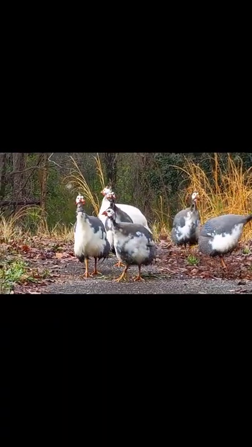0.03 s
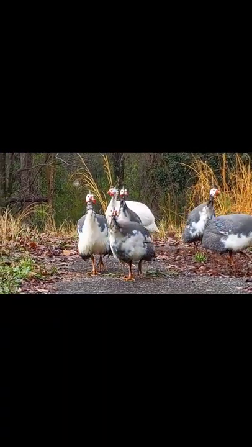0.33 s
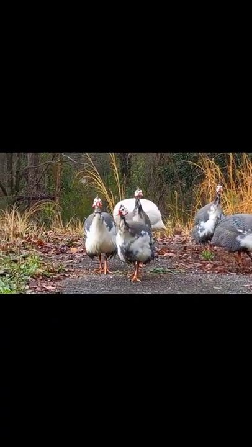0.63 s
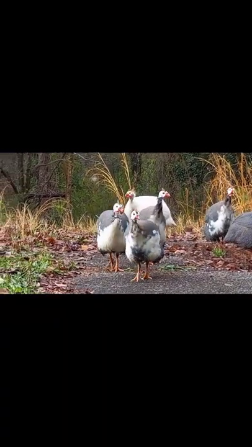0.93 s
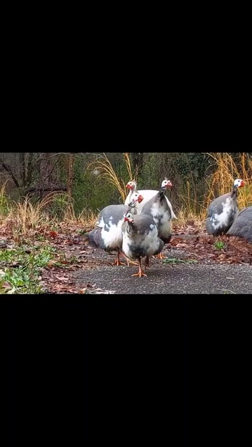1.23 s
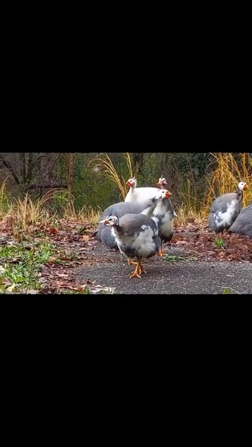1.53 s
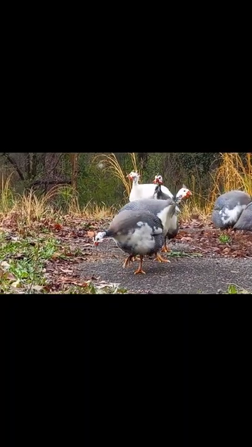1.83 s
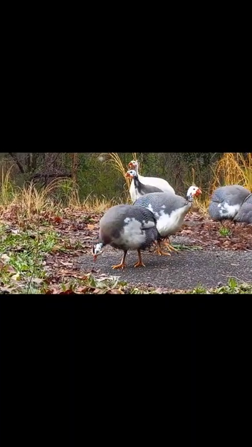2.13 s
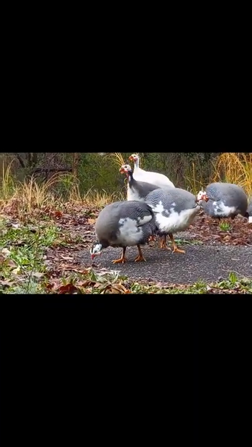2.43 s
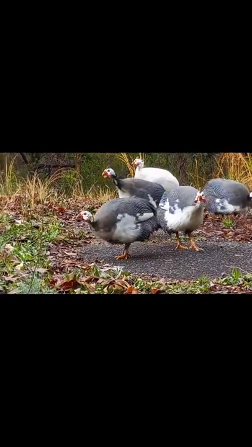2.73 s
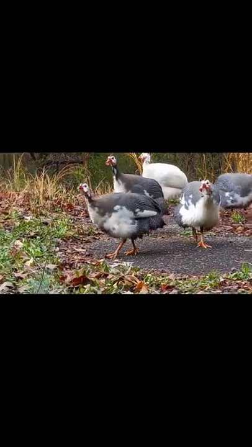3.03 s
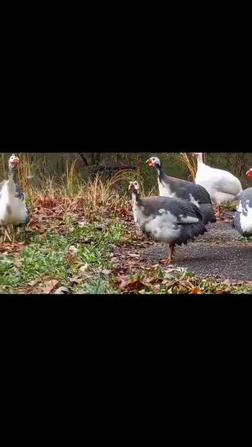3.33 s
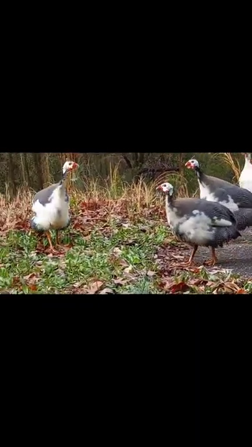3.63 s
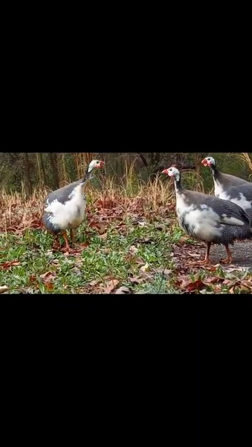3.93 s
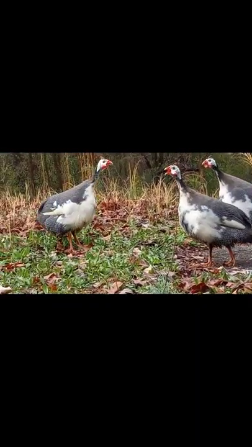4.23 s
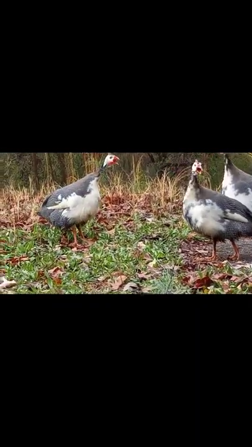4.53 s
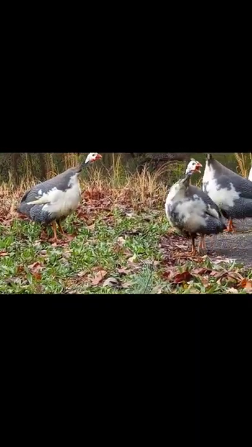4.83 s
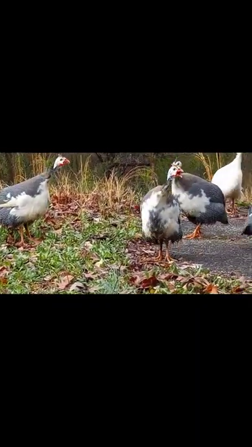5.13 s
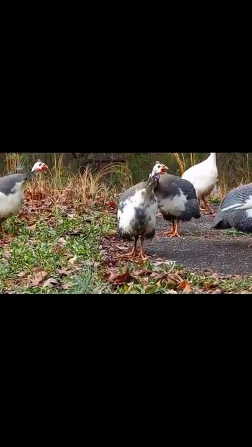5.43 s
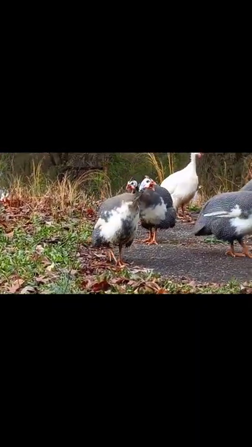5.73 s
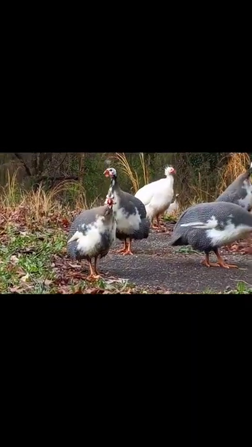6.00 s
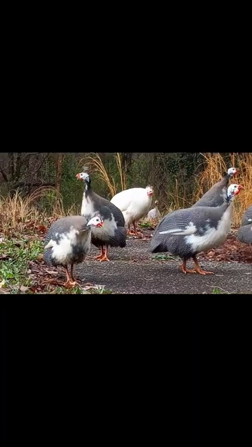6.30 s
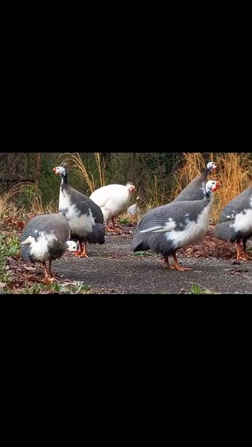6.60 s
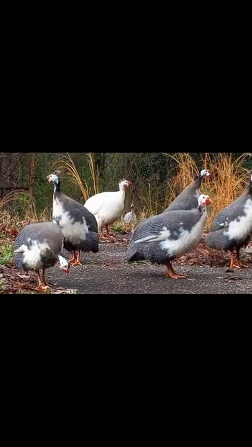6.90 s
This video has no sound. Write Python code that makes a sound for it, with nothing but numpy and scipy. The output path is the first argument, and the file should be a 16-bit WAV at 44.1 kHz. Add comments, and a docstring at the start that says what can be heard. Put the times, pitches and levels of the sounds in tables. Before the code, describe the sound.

A flock of guinea fowl calls a few steps from the microphone at the edge of a wood. Harsh, buzzing rasps come in bursts, often opening with a squeak and breaking into a shrill rattle. Midway the birds drop to soft clucks and peeps as the stereo image shifts. Then a louder, denser run of rasps and rattles follows, easing into short calls. A faint low rumble lies underneath.

```python
"""Guinea fowl scolding at a wood's edge

A flock on a path, a few steps from a stereo microphone that swings round midway. Snapping membranes
and puffs of air make each call a rasping buzz; it often opens with a squeak and, with the beak wide,
breaks into a shrill, fluttering rattle. In the pauses the birds peep and cluck. Ground and brush
scatter the calls; far behind lie two faint cries and a low outdoor rumble."""
import sys
import numpy as np
from scipy import signal
from scipy.fft import rfft, irfft
from scipy.io import wavfile
from scipy.ndimage import uniform_filter1d

SR = 44100
rng = np.random.default_rng(int(sys.argv[2]) if len(sys.argv) > 2 else 0)


def wav_record(signal):
    """Record a signal, one row per channel, as 16-bit PCM in the file named by sys.argv[1]."""
    frames = np.transpose(np.atleast_2d(signal))
    bounded = np.clip(frames, -1, 1)
    # unit amplitude maps onto the largest positive 16-bit level
    quanta = np.round(bounded * 32767).astype(np.int16)
    wavfile.write(sys.argv[1], SR, quanta)


N = 311346

# The flock, close by; all levels are relative. Drawn-out rasps, one table each: t/s, level/dB, pitch/Hz
LONG_RASPS = [
    [(.803, -27.5, 385.5), (.9, -28, 390.2), (.97, -27, 363.4), (1.04, -28.5, 353), (1.068, -38, 319)],
    [(1.292, -23.5, 378.5), (1.38, -28, 367.3), (1.51, -26, 386.6), (1.608, -27.5, 369.3),
     (1.642, -39.5, 313.6)],
    [(2.138, -27.5, 364), (2.26, -29.5, 352.4), (2.37, -25, 403.6), (2.48, -28, 367.5), (2.585, -25, 388.2),
     (2.67, -28.5, 361), (2.762, -29, 352), (2.79, -39, 327.5)],
    [(4.492, -29, 367.3), (4.56, -26.5, 350.5), (4.66, -26, 362.9), (4.82, -29, 381), (4.94, -28.5, 366),
     (5.03, -27.5, 385.2), (5.17, -31, 345)],
    [(5.49, -31.5, 352.6), (5.61, -28.5, 371.4), (5.8, -29.5, 374.3), (5.89, -28, 393.8),
     (6.07, -27.5, 378.9), (6.21, -28, 366), (6.25, -40.5, 340.5)],
]
# short rasps: start/s, length/s, level/dB, pitch/Hz
SHORT_RASPS = [(0.0, 0.049, -28.5, 368.3), (0.189, 0.13, -28.5, 382.8), (0.489, 0.17, -28, 379.2),
               (1.226, 0.048, -39.5, 349), (2.84, 0.071, -26, 379.5), (4.287, 0.092, -27, 352.4),
               (5.171, 0.14, -32.5, 365.2), (5.3, 0.053, -26.5, 379), (5.422, .075, -28, 377.3),
               (6.405, 0.16, -30.5, 367.2), (6.648, 0.16, -31, 379), (6.867, .14, -35.5, 363.5),
               (7.045, 0.032, -28.5, 371)]
# shrill rattles: start/s, loudest beat/s, end/s, level/dB, beak resonance/Hz, beat rate/Hz, depth/0-1
RATTLES = [(0.0, -0.014, .045, -15.5, 3550, 78, 0), (0.231, .289, .308, -19.5, 4140, 55, 0.16),
           (0.524, 0.577, .668, -19, 3410, 51, 0.26), (1.034, 1.081, 1.11, -24.5, 3770, 51, 0.4),
           (1.226, 1.25, 1.264, -20.5, 3750, 23, 0.11), (1.315, 1.337, 1.375, -27, 4130, 69, 0.22),
           (2.772, 2.784, 2.8, -28.5, 3400, 51, 0.01), (2.814, 2.829, 2.843, -36, 3450, 62, 0.2),
           (2.851, 2.889, 2.908, -26.5, 4300, 24, 0.13), (3.944, 3.971, 3.998, -24, 4160, 107, 0.23),
           (4.291, 4.323, 4.37, -16.5, 3920, 58, 0.2), (4.5, 4.531, 4.597, -21, 3850, 55, 0.25),
           (4.606, 4.643, 4.74, -16.5, 4120, 52, 0.34), (4.74, 4.848, 4.94, -20, 4100, 48.6, 0.46),
           (4.937, 4.966, 5.15, -21.5, 3896, 47.9, 0.32), (5.172, 5.21, 5.27, -19, 3820, 50, 0.27),
           (5.302, 5.333, 5.35, -17.5, 4040, 44, 0.22), (5.428, 5.461, 5.485, -16.5, 3940, 49, 0.25),
           (5.596, 5.623, 5.72, -15.5, 4210, 49, 0.17), (5.742, 5.796, 5.85, -22, 3700, 45, 0.18),
           (5.853, 5.888, 6.06, -16.5, 4370, 57, 0.02), (6.042, 6.095, 6.17, -21, 4050, 100, 0.06),
           (6.176, 6.217, 6.245, -21.5, 3876, 47, 0), (6.314, 6.352, 6.358, -25.5, 3650, 90, 0),
           (6.434, 6.479, 6.55, -22.5, 4110, 92, .12), (6.621, 6.663, 6.77, -24, 4540, 71, 0.03),
           (6.875, 6.944, 7.0, -25, 3840, 59, 0.23)]
# peeps and opening squeaks: start/s, length/s, start pitch/Hz, end pitch/Hz, level/dB, overtones/dB
PEEPS = [(0.185, 0.022, 1575, 1650, -36, -4), (0.483, 0.025, 1503, 1610, -39, -2),
         (0.797, 0.017, 1373, 1430, -51, 13), (1.028, 0.073, 963, 1007, -49.5, 6),
         (1.216, 0.028, 1318, 1460, -51, 17), (1.284, 0.019, 1493, 1660, -34, -9),
         (1.756, 0.018, 1408, 1492, -53, 13.5), (1.848, 0.045, 1504, 1450, -53, 1.5),
         (1.981, 0.023, 1440, 1530, -51.5, 11.5), (2.011, .012, 1810, 1430, -48.5, 12),
         (2.1, 0.049, 1496, 1413, -53, 9), (2.129, 0.024, 1474, 1615, -44, 10),
         (2.371, 0.017, 1637, 1350, -42, 13), (2.584, 0.01, 1570, 1380, -42.5, 18.5),
         (2.765, 0.029, 1720, 1350, -39.5, 4), (2.803, 0.045, 953, 845, -49, 11),
         (2.81, 0.041, 1904, 1640, -49.5, 22), (2.996, 0.051, 1810, 1455, -55, 19),
         (3.279, 0.075, 1048, 940, -57, 9.5), (3.382, 0.017, 1380, 1250, -52, 10),
         (3.588, 0.039, 1590, 1630, -43, -13), (4.118, 0.034, 1676, 1590, -41, -3),
         (4.279, 0.028, 1558, 1450, -33, 4.5), (4.482, 0.038, 1425, 1510, -36.5, 10),
         (5.181, 0.016, 1576, 1614, -28.5, -7), (5.382, 0.053, 961, 898, -53.5, 20),
         (5.598, 0.019, 1680, 1690, -29, -16), (6.231, 0.039, 950, 886, -53.5, 15),
         (6.306, 0.026, 1515, 1644, -48, 20.5), (6.399, 0.025, 1380, 1460, -46, 8.5),
         (6.605, 0.031, 1335, 1436, -52.5, 18), (6.809, 0.022, 1570, 1380, -43.5, 11),
         (7.044, 0.021, 1500, 1624, -40.5, 2)]
# soft hoarse clucks: start/s, length/s, level/dB
CLUCKS = [(1.757, 0.047, -42), (1.855, 0.04, -49), (1.989, 0.016, -40), (2.012, 0.007, -40),
          (2.918, 0.1, -37), (3.037, 0.097, -35), (3.113, 0.081, -43.5), (3.181, 0.057, -37),
          (3.226, 0.067, -44.5), (3.368, 0.019, -44), (3.396, 0.074, -38), (3.456, 0.068, -46),
          (3.514, 0.094, -39), (3.578, 0.14, -38), (3.686, 0.077, -44), (3.745, 0.071, -36.5),
          (3.804, 0.079, -43.5), (3.873, 0.078, -35), (3.993, 0.075, -35), (4.048, 0.097, -40),
          (5.35, 0.1, -28), (6.28, 0.063, -34), (6.819, 0.069, -30)]
# throat colour of the rasp, the rattle (outside its main resonance) and the cluck: f/Hz, gain/dB
RASP_THROAT = [(200, -30.5), (480, -23), (690, -21.5), (820, -33.5), (980, -28), (1200, -17), (1400, -14.5),
               (1700, -3), (2150, -7), (2450, -9.5), (3100, -8), (4200, -7.5), (5450, -5.5), (6500, -17),
               (7500, -14.5), (9000, -18), (15000, -20.5)]
RATTLE_THROAT = [(200, -28), (370, -14.5), (520, -29), (830, -29), (1200, -18.5), (1900, -10.5),
                 (2400, -10.5), (2850, -6), (3800, -5), (4700, -7), (5500, -6), (6600, -29), (7500, -11.5),
                 (8900, -24.5), (10500, -14), (15000, -24.5)]
CLUCK_THROAT = [(200, -71), (370, -11), (520, -26.5), (1100, -16), (1700, -8), (2200, -11), (2900, -3),
                (4400, -0.5), (6300, -18.5), (15000, -24.5)]
# slow rise and fall of the calls' top treble: t/s, gain/dB
TOP_TREBLE = [(0, -2.5), (.8, -1.5), (1.3, -0.5), (2.3, 0), (3.0, -2), (4.299, -3.5), (4.9, -3.5),
              (5.5, -2), (5.95, 1.5), (6.25, -1), (6.5, -3.5), (7.05, -5.5)]
# faint cries, far off: start/s, length/s, pitch/Hz, level/dB
FAR_CRIES = [(1.075, 0.16, 720, -48.5), (3.526, 0.39, 725, -50)]
# scatter from ground and leaves close by: f/Hz, gain/dB
GROUND_SCATTER = [(300, -32), (900, 6.5), (1800, -1.5), (3500, 0), (12000, -5)]
# reverberation among the trees: f/Hz, gain/dB, t60/s
WOOD_REVERB = [(300, -17.5, 0.5), (1670, -11, 0.44), (3970, -15, 0.4), (8000, -12.5, 0.25),
               (15000, -11, 0.12)]
# colour of the distant rumble and hiss: f/Hz, gain/dB
RUMBLE_COLOUR = [(20, -31), (45, -14.5), (70, 2.5), (100, 1.5), (160, -8.5), (300, -18), (600, -33),
                 (1600, -23), (4000, -18), (7000, -35), (15000, -45)]
# their loudness: t/s, level/dB
RUMBLE_LEVEL = [(0.0, -45), (0.16, -59.5), (0.76, -55.5), (6.01, -55.5), (6.18, -65), (7.05, -58.5)]
# the birds' direction before and after the microphone swings: f/Hz, phase lead of the left port/rad
LEAD_BEFORE = [(400, 0.051), (2100, 0.54), (3600, 2.45), (7000, 1.86), (15000, 0.94)]
LEAD_AFTER = [(400, 0.26), (2300, -0.12), (3100, -1.58), (5400, -1.33), (15000, -1.7)]
# balance of the microphone's two ports: f/Hz, left minus right/dB
PORT_BALANCE = [(60, -3.5), (140, -6.5), (250, -2), (500, -1.5), (1170, 2.5), (1790, 4), (2740, -1.5),
                (4200, -0.5), (15000, -2)]


def gain_of(db):
    """Decibels to a factor."""
    return 10 ** (np.asarray(db) / 20)


def unit_rms(x):
    """Scales to rms 1."""
    return x / np.sqrt(np.mean(x ** 2) + 1e-20)


def at_hz(points, hz, column=1):
    """One column of a table, interpolated on a log-frequency axis."""
    table = np.transpose(points)
    return np.interp(np.log(hz + 1), np.log(table[0] + 1), table[column])


def add(mix, start, sound):
    """Mixes a sound in at start/s."""
    part = mix[max(round(start * SR), 0):][:len(sound)]
    part += sound[:len(part)]


def wander(count, hz):
    """Random drift of rms 1 that changes about hz times a second."""
    at = np.arange(count) * hz / SR
    knots = int(at[-1]) + 2
    return unit_rms(np.interp(at, np.arange(knots), rng.standard_normal(knots)))


def coloured(x, points, size=2048):
    """Causal filter with the given spectrum; the result has rms 1."""
    log_gain = np.log(gain_of(at_hz(points, abs(np.fft.fftfreq(size, 1 / SR)))))
    taps = np.fft.ifft(np.exp(signal.hilbert(log_gain).conj())).real
    return unit_rms(signal.fftconvolve(x, taps)[:len(x)])


def resonate(x, hz, width_hz):
    """A resonance that follows the curve hz."""
    turn = np.exp(2j * np.pi * np.cumsum(hz * np.ones(len(x))) / SR)
    pole = np.exp(-np.pi * width_hz / SR)
    return (turn * signal.lfilter([1 - pole], [1, -pole], x / turn)).real


def steadied(x, size):
    """Holds a rough sound at even strength over spans of size samples."""
    return x / np.sqrt(abs(uniform_filter1d(x ** 2, size)) + 1e-6)


def treble_shelf(x, db, corner_hz):
    """Raises or lowers everything above the corner by the curve db."""
    highpass = signal.butter(4, corner_hz, "high", fs=SR, output="sos")
    return x + signal.sosfiltfilt(highpass, x) * (gain_of(db) - 1)


def call_curves(course, fade_s=.007):
    """Time, faded amplitude and frequency of one call, sample by sample."""
    times, db, hz = np.transpose(course)
    t = np.arange(times[0] - fade_s / 2, times[-1] + fade_s, 1 / SR)
    edges = np.clip(np.minimum(t - t[0], t[-1] - t) / fade_s, 0, 1)
    return t, edges * gain_of(np.interp(t, times, db)), np.interp(t, times, hz)


def syrinx(hz, jitter, shimmer_db, hiss, puff_cycles=.35):
    """Uneven snaps of the membranes, each followed by a puff of air; also returns the cycle count."""
    count = len(hz)
    turns = np.cumsum(hz * (1 + .011 * wander(count, 90))) / SR
    uneven = np.maximum.accumulate(turns + jitter * wander(count, 400))
    cycle = (np.floor(uneven) - np.floor(uneven[0])).astype(int)
    strength = gain_of(shimmer_db * np.clip(rng.standard_normal(cycle[-1] + 1), -2, 2))[cycle]
    snaps = unit_rms(np.diff(cycle, prepend=0))
    puffs = unit_rms(np.exp(-(uneven % 1) / puff_cycles) * rng.standard_normal(count))
    return unit_rms(strength * (np.sqrt(1 - hiss) * snaps + np.sqrt(hiss) * puffs)), turns


def rasp(course, nasal_db):
    """A buzz through a throat with a steady nasal ring; its low harmonics stay clear under the snaps."""
    t, level, hz = call_curves(course)
    age = t - t[0]
    drive, turns = syrinx(hz, jitter=.035, shimmer_db=2, hiss=.7)
    harmonics = .1 * sum(np.cos(2 * np.pi * k * turns) for k in range(2, 7))
    body = coloured(drive + harmonics, RASP_THROAT)
    nasal = unit_rms(resonate(body, hz=1880, width_hz=450))
    swell = np.clip(.56 + age / .051, 0, 1)  # the buzz grows out of the opening squeak
    buzz = steadied(body + gain_of(nasal_db) * nasal, size=600) * swell
    fundamental = np.sin(2 * np.pi * turns + .3 * wander(len(t), 70))
    fundamental *= gain_of(-11 + 1.14 * wander(len(t), 61.6))
    settled = np.clip(age / .034, 0, 1)  # the fundamental needs a few cycles to build
    return t[0], level * (gain_of(2.5) * buzz + settled * fundamental)


def short_rasp_course(start, length, db, hz, scoop=.04, scoop_s=.015, sag=.1):
    """Rows of t/s, level/dB, pitch/Hz: the rasp scoops up, holds, then sags and fades."""
    t = np.linspace(0, length, 30)
    release = np.clip(1 - (length - t) / .03, 0, 1)
    pitch = hz * (1 - scoop * np.exp(-t / scoop_s) - sag * (t / length) ** 2.2)
    return np.transpose([start + t, db - 6 * release ** 2, pitch])


def flutter(t, loudest, rate, depth):
    """The quick beat of a rattle, swinging between -depth and +depth."""
    return depth * np.cos(2 * np.pi * rate * (t - loudest))


def chopped(buzz, beat_hz=51, drift_hz=4.2, body_db=4, treble_db=8):
    """Chops the rasps, their treble most, into quick beats, in step with a rattle wherever one sounds."""
    t = np.arange(N) / SR
    turns = np.cumsum(beat_hz + drift_hz * wander(N, 20)) / SR
    chop = .3 * np.cos(2 * np.pi * turns)  # body_db and treble_db are per unit of chop
    for start, loudest, end, _, _, rate, depth in RATTLES:
        inside = (t > start) & (t < end)
        chop[inside] = flutter(t[inside], loudest, rate, depth)
    chop = uniform_filter1d(chop, size=60)
    return gain_of(body_db * chop) * treble_shelf(buzz, treble_db * chop - .5, corner_hz=2500)


def rattle(course, loudest, rate, depth):
    """With the beak wide the buzz turns shrill and is chopped into quick beats."""
    t, level, beak_hz = call_curves(course)
    drive, _ = syrinx(hz=368 + 15 * wander(len(t), 20), jitter=.04, shimmer_db=1.2, hiss=.6)
    body = coloured(drive, RATTLE_THROAT)
    ring = unit_rms(resonate(body, beak_hz * (1 + .055 * wander(len(t), 106.4)), width_hz=420))
    shrill = steadied(body + gain_of(3.5) * ring, size=300)
    beats = unit_rms(gain_of(13 * flutter(t, loudest, rate, depth)))
    return t[0], gain_of(2.5) * level * beats * shrill


def rattle_course(start, loudest, end, db, beak_hz, hz_per_db=47):
    """Rows of t/s, level/dB, f/Hz: effort swells and ebbs; it opens the beak, raising its resonance."""
    t = np.linspace(start, end, 30)
    effort_db = np.interp(t, [start, loudest, end], [-5, 0, -11.5])
    return np.transpose([t, db + effort_db, beak_hz + hz_per_db * effort_db])


def peep(start, length, start_hz, end_hz, db, overtones_db):
    """A short hoarse whistle that glides, with a few overtones shaped by the beak."""
    count = int(length * SR)
    quaver = .04 * wander(count, 900)
    phase = 2 * np.pi * np.cumsum(np.linspace(start_hz, end_hz, count) * (1 + quaver)) / SR
    beak = [(1500, -32), (2200, -1.5), (3000, -.5), (3700, -3), (4800, -13.5),
            (6500, -31), (12000, -31.5)]  # f/Hz, gain/dB
    mid_hz = (start_hz + end_hz) / 2
    overtones = sum(gain_of(at_hz(beak, k * mid_hz)) * np.sin(k * phase) for k in range(2, 9))
    tone = np.sqrt(2) * (np.sin(phase) + gain_of(overtones_db) * overtones)
    breath = gain_of(-5) * coloured(rng.standard_normal(count), CLUCK_THROAT)
    level = gain_of(db + 5.5 + 2 * wander(count, 446)) * signal.windows.tukey(count, .8)
    return start, level * (tone + breath)


def cluck(start, length, db):
    """A brief breathy buzz that starts quickly and sinks away."""
    progress = np.linspace(0, 1, int(length * SR))
    drive, _ = syrinx(hz=375 - 25 * progress, jitter=.05, shimmer_db=1.5, hiss=.7, puff_cycles=.3)
    level = gain_of(db - .5 - 4.7 * progress) * signal.windows.tukey(len(progress), .5)
    return start, level * coloured(drive, CLUCK_THROAT)


def far_cry(start, length, hz, db):
    """A hoarse two-partial cry, blurred by distance."""
    noise = rng.standard_normal(int(length * SR))
    low = unit_rms(resonate(resonate(noise, hz, width_hz=170), hz, width_hz=170))
    high = unit_rms(resonate(resonate(noise, 2.2 * hz, width_hz=820), 2 * hz, width_hz=760))
    level = gain_of(db) * signal.windows.tukey(len(noise), .5)
    return start, level * (gain_of(-7) * low + gain_of(-2) * high)


def at_ports(x, lead):
    """A sound from one direction, reaching the microphone's two ports out of phase."""
    turn = np.exp(.5j * at_hz(lead, np.fft.rfftfreq(N, 1 / SR)))
    return irfft(rfft(x) * np.array([turn, turn.conj()]), N)


def reflections(x, bands, delay_s, t60_s=None):
    """Sparse random echoes for each side, dying in t60_s or else in each band's own time."""
    taps = rng.choice([-1., 1.], (2, SR)) * (rng.random((2, SR)) < 1 / 8)
    hz, t, spectra = signal.stft(taps, SR, nperseg=128)
    t60 = t60_s or at_hz(bands, hz, column=2)[:, None]
    decay = gain_of(at_hz(bands, hz)[:, None] - 60 * t / t60)
    unit_energy = np.sqrt(8 * np.log(1e6) / (t60 * SR))
    _, tail = signal.istft(spectra * decay * unit_energy, SR, nperseg=128)
    delayed = np.pad(tail, ((0, 0), (int(delay_s * SR), 0)))
    return signal.fftconvolve(x[None], delayed, axes=1)[:, :N]


def wood_edge(birds, swing_s=(2.95, 3.9), echo_sets=6, sets_per_s=5):
    """Direct sound at the swinging microphone, quick scatter off the ground, a soft tail from trees."""
    t = np.arange(N) / SR
    swung = np.interp(t, swing_s, [0, 1])
    heard = at_ports(birds * (1 - swung), LEAD_BEFORE) + at_ports(birds * swung, LEAD_AFTER)
    for k in range(echo_sets):  # as the heads turn, one set of reflections gives way to the next
        offset = (t * sets_per_s - k + 1) % echo_sets - 1
        part = birds * np.sqrt(np.clip(1 - abs(offset), 0, 1))
        heard += reflections(part, GROUND_SCATTER, delay_s=.0004, t60_s=.025)
        heard += reflections(part, WOOD_REVERB, delay_s=.012)
    return gain_of(-1) * heard


def distant_rumble():
    """A low distant rumble and faint hiss, mostly shared by both sides."""
    shared, left, right = (coloured(rng.standard_normal(N), RUMBLE_COLOUR, size=8192) for _ in range(3))
    level_db = np.interp(np.arange(N) / SR, *np.transpose(RUMBLE_LEVEL))
    return gain_of(level_db + 4) * (.74 * shared + .33 * np.array([left, right]))


def scene():
    """The flock on the path, a few steps off, with the wood and the rumble behind."""
    buzz = np.zeros(N)
    for course in LONG_RASPS:
        add(buzz, *rasp(np.add(course, [0, 1, 0]), nasal_db=-8))  # lifted by 1 dB
    for row in SHORT_RASPS:
        add(buzz, *rasp(short_rasp_course(*row), nasal_db=-17))
    birds = chopped(buzz)
    for start, loudest, end, db, beak_hz, rate, depth in RATTLES:
        add(birds, *rattle(rattle_course(start, loudest, end, db, beak_hz), loudest, rate, depth))
    for source, table in ((peep, PEEPS), (cluck, CLUCKS), (far_cry, FAR_CRIES)):
        for row in table:
            add(birds, *source(*row))
    treble_db = np.interp(np.arange(N) / SR, *np.transpose(TOP_TREBLE))
    return wood_edge(treble_shelf(birds, treble_db, corner_hz=8200)) + distant_rumble()


def record(dry, ceiling=.85, edge_hz=15400):
    """The microphone: each port has its own colour, the highest peaks round off, the band is limited."""
    tilt_db = at_hz(PORT_BALANCE, np.fft.rfftfreq(N, 1 / SR)) / 2
    ports = irfft(rfft(dry) * gain_of([tilt_db, -tilt_db]), N)
    rounded = ports / (1 + (ports / ceiling) ** 4) ** .25
    lowpass = signal.firwin(511, edge_hz, window=("kaiser", 9), fs=SR)
    return signal.oaconvolve(rounded, lowpass[None], "same")


dry = scene()
out = record(dry)
wav_record(out)
```